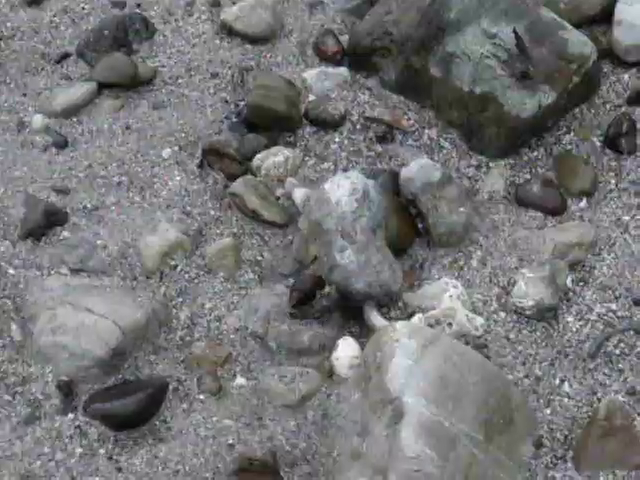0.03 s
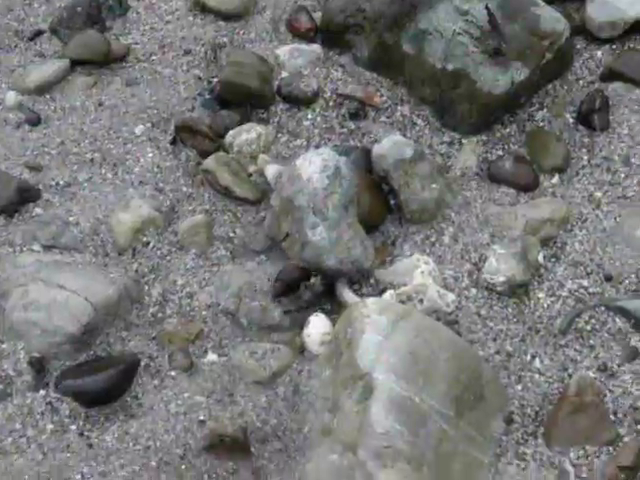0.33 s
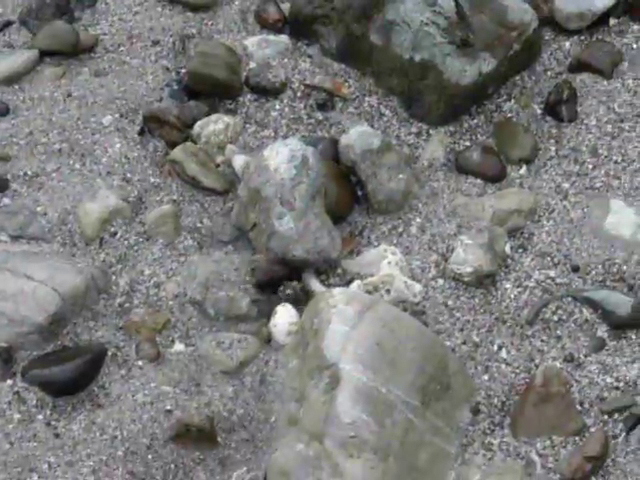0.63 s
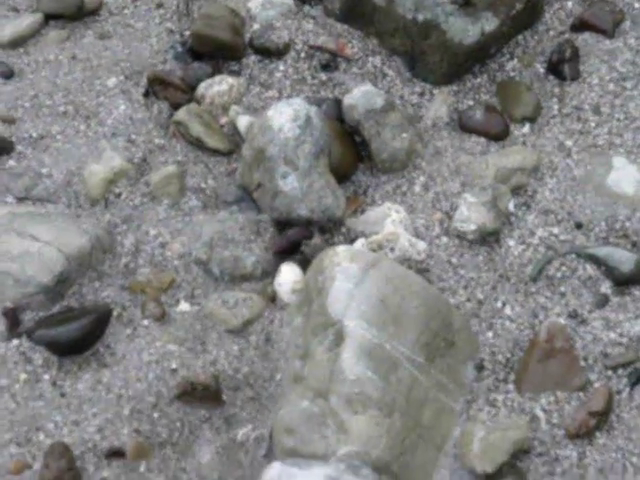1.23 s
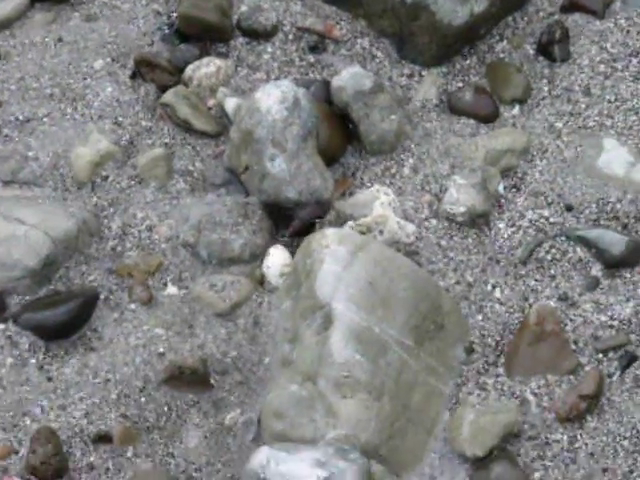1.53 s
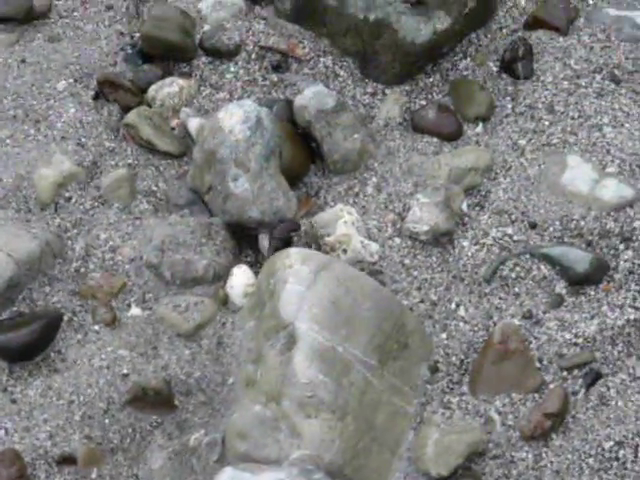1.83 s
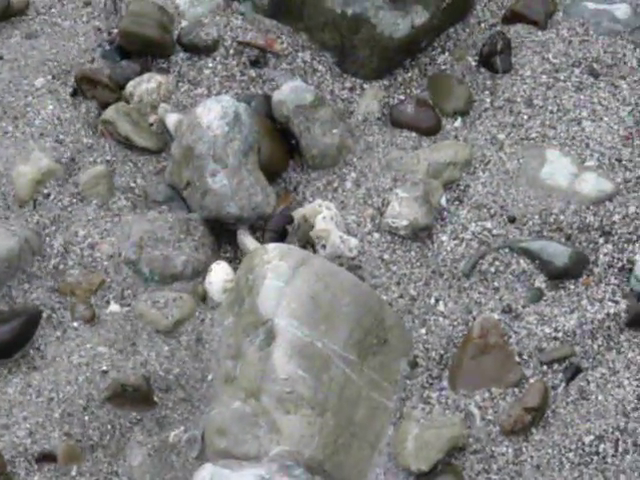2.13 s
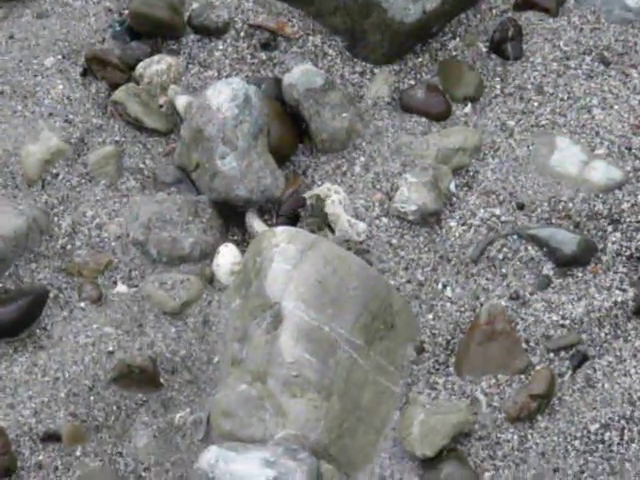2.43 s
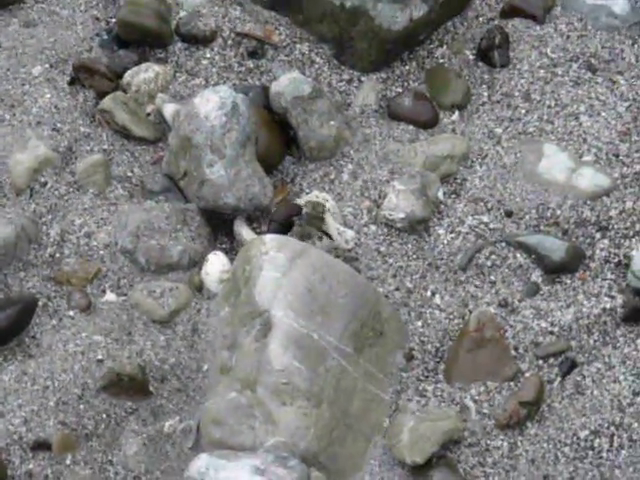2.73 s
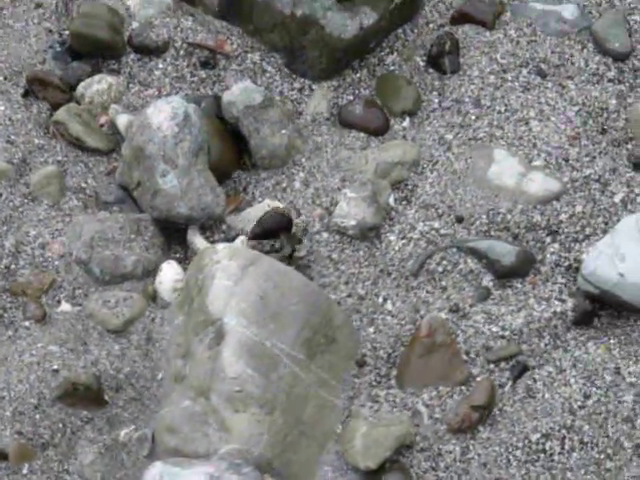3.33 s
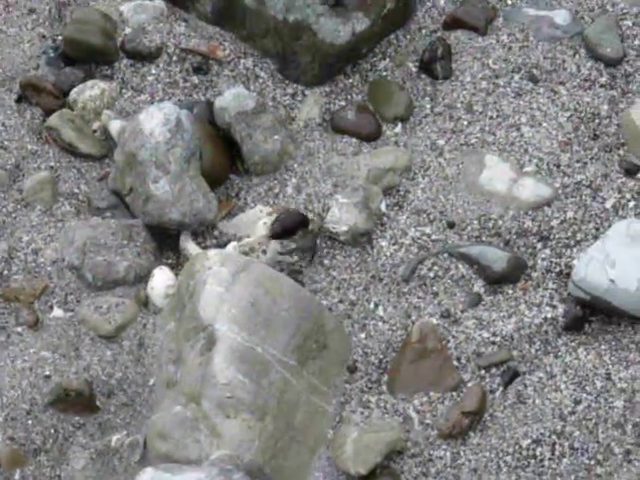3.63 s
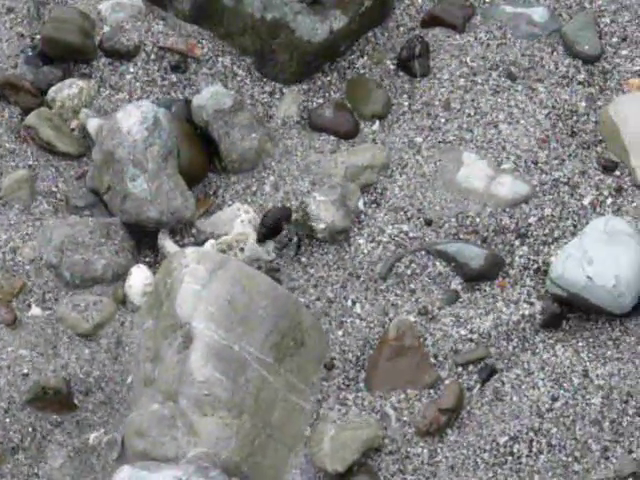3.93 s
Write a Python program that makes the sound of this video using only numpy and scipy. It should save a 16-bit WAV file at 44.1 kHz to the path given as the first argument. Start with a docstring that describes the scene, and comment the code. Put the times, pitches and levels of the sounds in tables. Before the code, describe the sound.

Distant surf rushes steadily on a pebbly beach, with one sharp click.

```python
"""A pebbly beach, heard by a small hand-held camera.
Distant surf makes a steady rush, a low roar under a brighter wash; a light breeze rumbles underneath.
Nearby, shifting gravel ticks and scrapes faintly. One sharp click excites the modes of the
camera's case and overloads its narrow-band microphone input."""
import sys
import numpy as np
from scipy import signal
from scipy.fft import rfft, irfft, next_fast_len
from scipy.io import wavfile
from scipy.ndimage import uniform_filter1d, map_coordinates

SR = 44100
rng = np.random.default_rng(int(sys.argv[2]) if len(sys.argv) > 2 else 0)


def dump(signal):
    """Clip the signal to [-1, 1] and save it as 16-bit WAV at the path in sys.argv[1]."""
    limited = np.clip(np.atleast_2d(signal).T, -1, 1)
    pcm = np.round(limited * 32767).astype(np.int16)
    wavfile.write(sys.argv[1], SR, pcm)


N = 176400


def amp(db):
    """Decibels as an amplitude ratio."""
    return 10 ** (np.asarray(db) / 20)

def unit(x):
    """Normalisation to rms 1."""
    return x / np.sqrt(np.mean(x ** 2) + 1e-20)

def curve(rows):
    """Linear interpolation of (seconds, value) rows at every sample."""
    return np.interp(np.arange(N) / SR, *np.transpose(rows))

def since(s):
    """Seconds since a moment, zero before it."""
    return np.maximum(np.arange(N) / SR - s, 0)

def wobble(rate):
    """Smooth random modulation: a spline with rate knots a second."""
    knots = rng.standard_normal(int(N * rate / SR) + 4)
    return map_coordinates(knots, [np.arange(N) * rate / SR])

def filtered(x, response):
    """Linear filtering: the spectrum of x times a frequency response."""
    size = next_fast_len(N + SR // 2)
    return irfft(rfft(x, size) * response(np.fft.rfftfreq(size, 1 / SR)), size)[:N]

def low_pass(x, edge_hz, order):
    """Attenuation above an edge, steeper with higher order."""
    return filtered(x, lambda hz: 1 / (1 + (hz / edge_hz) ** order))

def shaped(x, spectrum):
    """Filtering by (Hz, dB) rows joined on a log frequency axis."""
    row_hz, row_db = np.transpose(spectrum)
    return filtered(x, lambda hz: amp(np.interp(np.log(hz + 1), np.log(row_hz + 1), row_db)))

def noise(spectrum):
    """Coloured Gaussian noise of rms 1."""
    return unit(shaped(rng.standard_normal(N), spectrum))

def rush(spectrum, patchy_db):
    """Coloured noise of rms 1, modulated in random patches of time and frequency."""
    cells = signal.stft(rng.standard_normal(N), nperseg=512)[2]
    patches = uniform_filter1d(rng.standard_normal(cells.shape), size=6, axis=0)
    patches = uniform_filter1d(patches, size=14, axis=1)
    patchy = signal.istft(cells * amp(patchy_db * unit(patches)), nperseg=512)[1][:N]
    return unit(shaped(patchy, spectrum))


# Each row: frequency in Hz, relative spectral density in dB.
ROAR_SPECTRUM = [(15, -16.5), (35, -14), (70, -9.5), (130, -4), (250, -.8), (310, 0), (400, .3), (510, -2),
                 (650, -3), (800, -3.5), (1000, -5.5), (1250, -14.5), (2000, -24), (4000, -45.5),
                 (8000, -81.5)]
WASH_SPECTRUM = [(200, -33), (700, -8.5), (1200, 1), (1850, 1.15), (2250, -3), (2800, -5.5), (3500, -9),
                 (4300, -12), (5100, -15), (5500, -27.5), (5850, -31.5), (6150, -40.5), (6500, -67.5)]
# Each row: time in seconds, relative level in dB.
ROAR_SWELL = [(0, -21.5), (.8, -22.5), (1.5, -22), (2.3, -23), (3.2, -22.5), (4, -22)]
WASH_SWELL = [(0, -32), (.6, -31.5), (1.2, -31), (1.45, -32), (1.9, -31.5), (2.35, -31.6), (2.8, -31.5),
              (3.3, -30.5), (3.7, -31), (4, -29.5)]

def surf(roar_gain_db=0.31, wash_gain_db=1.27):
    """Incoherent addition: the low roar of far breakers sums with the brighter, fluttering wash."""
    roar = amp(roar_gain_db + curve(ROAR_SWELL) + 0.38 * wobble(8)) * rush(ROAR_SPECTRUM, patchy_db=0.5)
    wash = amp(wash_gain_db + curve(WASH_SWELL) + 0.3 * wobble(60)) * rush(WASH_SPECTRUM, patchy_db=0.42)
    return roar + wash


# Each row: frequency in Hz, relative spectral density in dB.
BREEZE_SPECTRUM = [(10, 2.5), (30, 0.5), (60, 2), (120, -18.5), (400, -49)]
# Each row: time in seconds, level in dB.
BREEZE_SWELL = [(0, -50.5), (.8, -41), (1.7, -40.5), (2.4, -53.5), (4, -50.5)]

def breeze():
    """Flow noise: air moving past the microphone makes a low rumble."""
    return amp(curve(BREEZE_SWELL) + 1.2 * wobble(7)) * rush(BREEZE_SPECTRUM, patchy_db=2.2)


# Each row: start in seconds, relative peak level in dB.
PEBBLE_TICKS = [(1.083, -28), (1.549, -31), (1.844, -28), (1.877, -19), (1.909, -26), (2.079, -25.5),
                (2.146, -19.5), (2.181, -17), (2.223, -22), (2.740, -27), (3.137, -33), (3.512, -27),
                (3.882, -25.5)]
# Each row: frequency in Hz, relative spectral density in dB.
PEBBLE_SPECTRUM = [(600, -23), (1800, 2), (3200, -1), (5000, -13.5)]

def pebble_ticks(t60_s=0.023, gain_db=-4):
    """Impact noise: each tiny contact between pebbles gives a burst that decays exponentially."""
    envelope = sum(amp(db - 60 * since(s) / t60_s) * (since(s) > 0) for s, db in PEBBLE_TICKS)
    return amp(gain_db) * low_pass(envelope * noise(PEBBLE_SPECTRUM), edge_hz=5100, order=30)


# Each row: frequency in Hz, relative spectral density in dB.
GRAVEL_SPECTRUM = [(400, -22), (950, -0.5), (1800, 1.5), (2900, -2.5), (3800, -20), (5500, -38)]

def gravel_scrape(peak_s=1.567, width_s=0.035, level_db=-27.5):
    """Friction noise: gravel shifts softly, rising and falling in a brief Gaussian envelope."""
    envelope = np.exp(-.5 * ((since(0) - peak_s) / width_s) ** 2)
    return amp(level_db + 1.2 * wobble(120)) * envelope * noise(GRAVEL_SPECTRUM)


# Each row: frequency in Hz, level in dB, time to decay by 60 dB in seconds.
CASE_MODES = [(916, -13, 0.046), (1197, -11, 0.025), (1453, -1.5, 0.019), (1752, -3, 0.011),
              (2000, 1, 0.013), (2470, -10.5, 0.023), (2850, -6, 0.0188), (4383, -13, 0.011),
              (4985, -11.5, 0.0098), (3250, -24, .12), (4020, -34.5, 0.14)]
# Each row: frequency in Hz, relative spectral density in dB.
CRACK_SPECTRUM = [(400, -19), (1400, 3.5), (2800, -1), (3800, -8.5), (5200, -7), (5700, -13.5), (6300, -37)]

def case_click(start_s=2.4188, attack_s=0.0017, drive_s=0.0045, crack_db=-5.5, crack_t60_s=0.017):
    """Damped free vibration: a noisy snap briefly drives the case, then its modes ring out."""
    age, free = since(start_s), since(start_s + drive_s)
    ring = sum(amp(db - 60 * free / t60) * np.sin(2 * np.pi * (hz * age + rng.random()))
               for hz, db, t60 in CASE_MODES)
    crack = amp(crack_db - 60 * free / crack_t60_s) * noise(CRACK_SPECTRUM)
    attack = 1 - np.exp(-age / attack_s)
    return attack * (ring + crack)


def scene():
    """Superposition: all sources add at one microphone."""
    return (surf() + breeze() + pebble_ticks() + gravel_scrape() + case_click())[None]


# Each row: frequency in Hz, gain of the camera's treble response in dB.
TREBLE_RESPONSE = [(6000, 0), (6500, -6.5), (7400, -10), (9200, -0.5), (12000, -7.5), (15500, -9.5)]

def record(dry, opening_silence_s=.037, clip_at=.71):
    """Clipping distortion: overload of the narrow-band input spreads energy above its band."""
    after_opening_silence = dry[0] * (since(opening_silence_s) > 0)
    narrow = low_pass(after_opening_silence, edge_hz=6150, order=60)
    clipped = np.clip(narrow, -clip_at, clip_at)
    return low_pass(shaped(clipped, TREBLE_RESPONSE), edge_hz=16000, order=80)[None]


dry = scene()
out = record(dry)
dump(out)
```